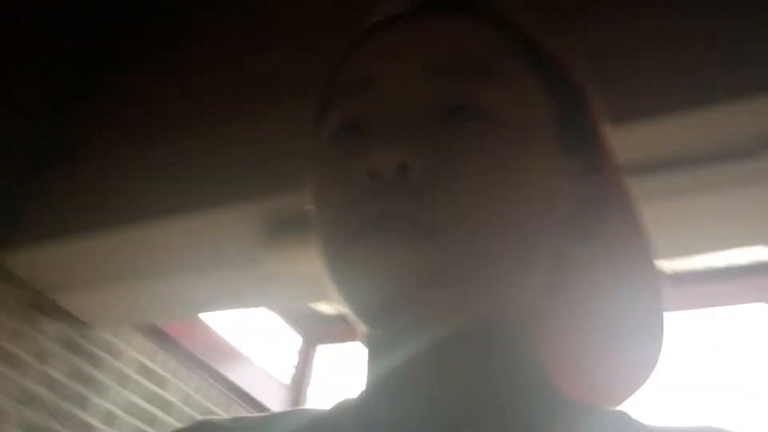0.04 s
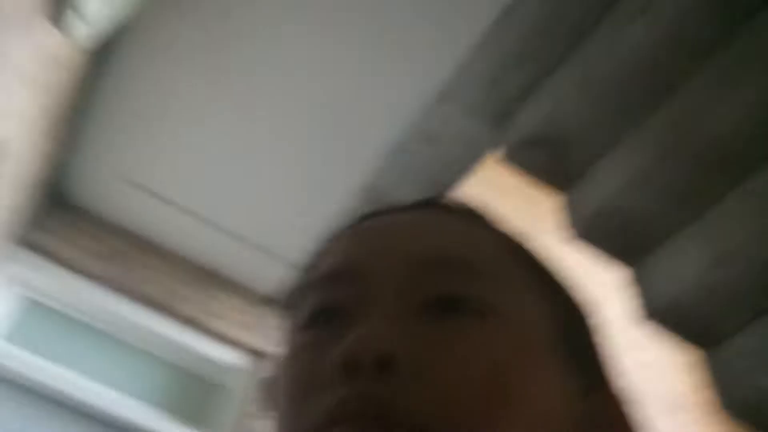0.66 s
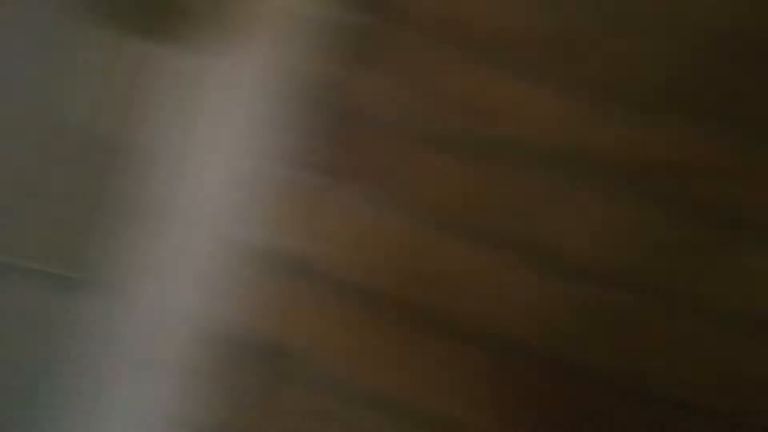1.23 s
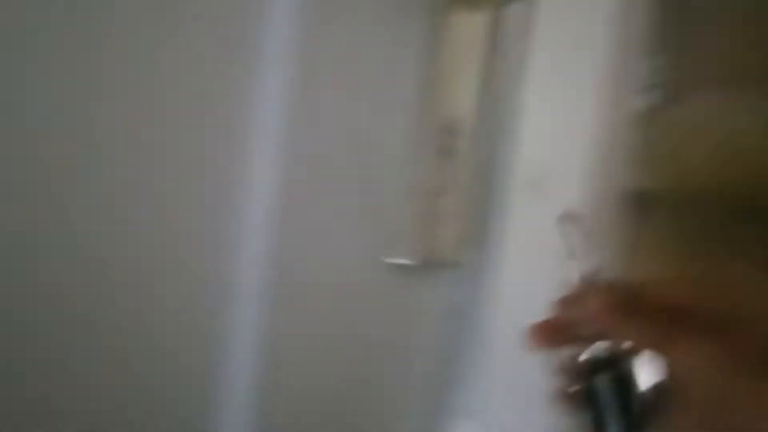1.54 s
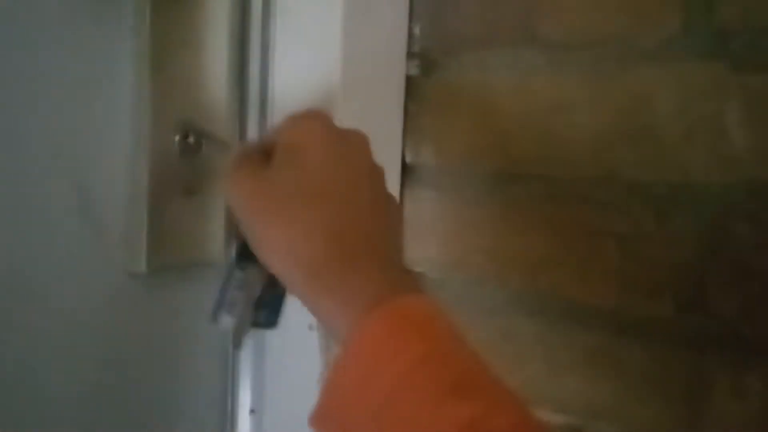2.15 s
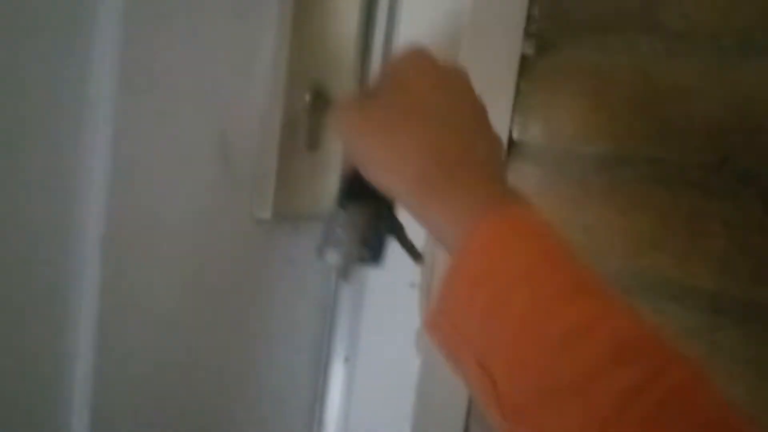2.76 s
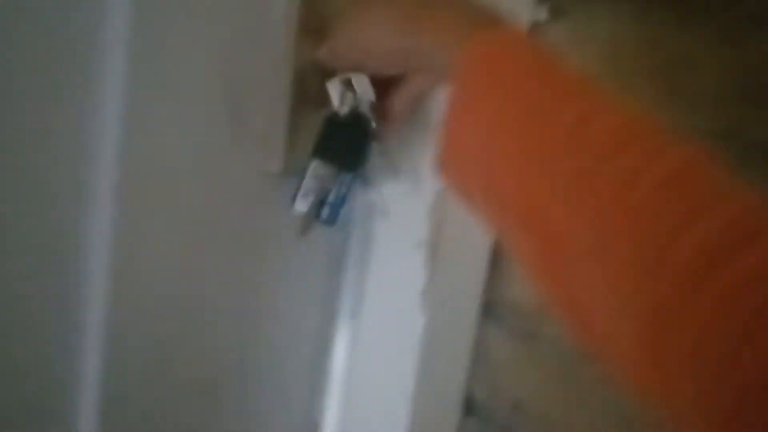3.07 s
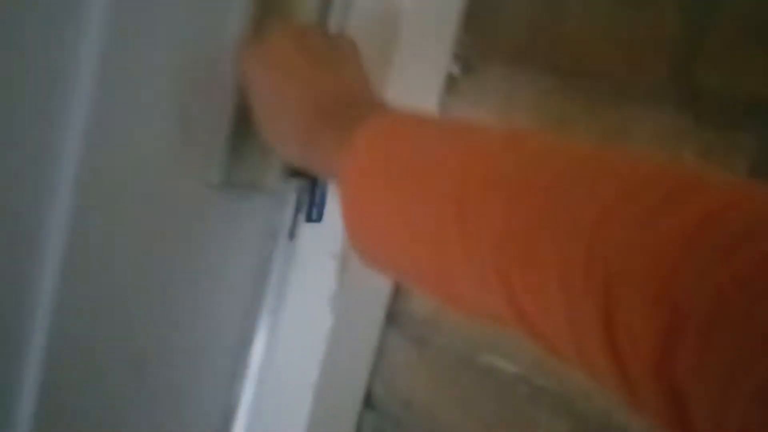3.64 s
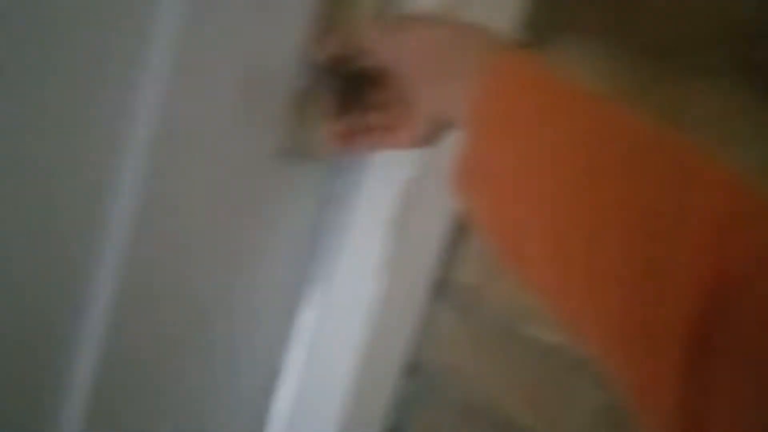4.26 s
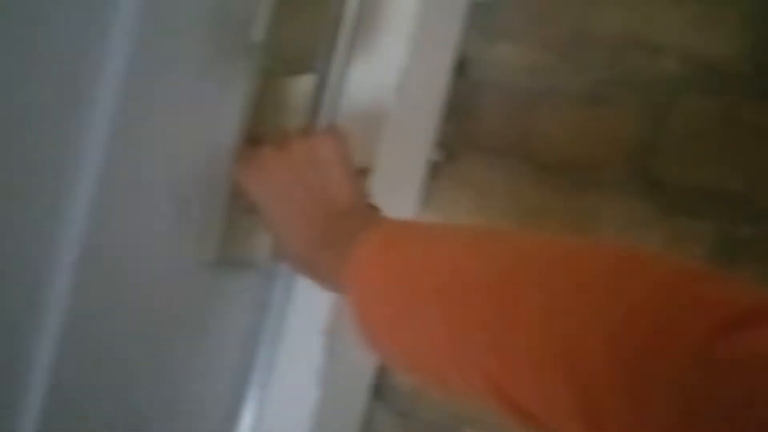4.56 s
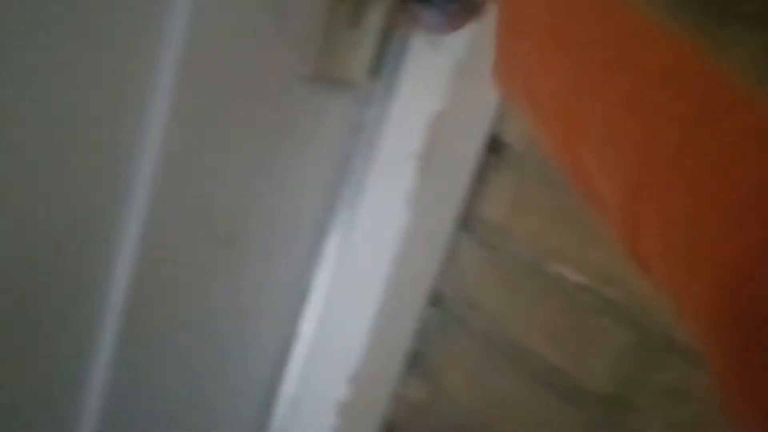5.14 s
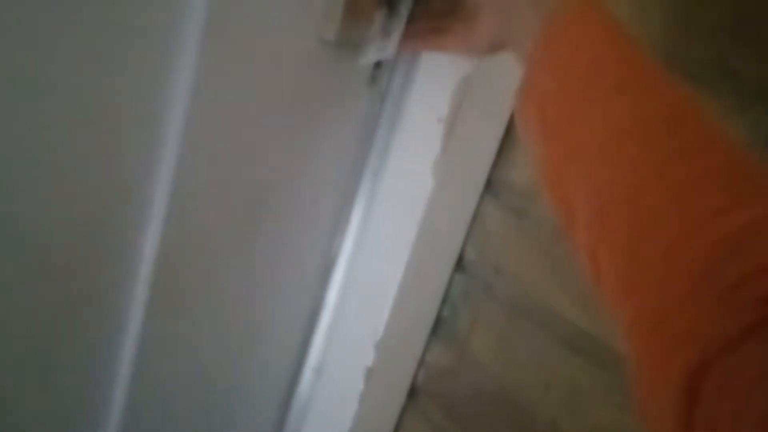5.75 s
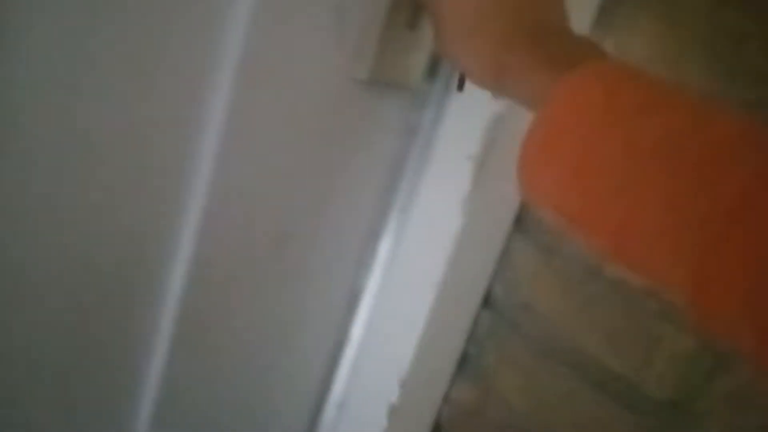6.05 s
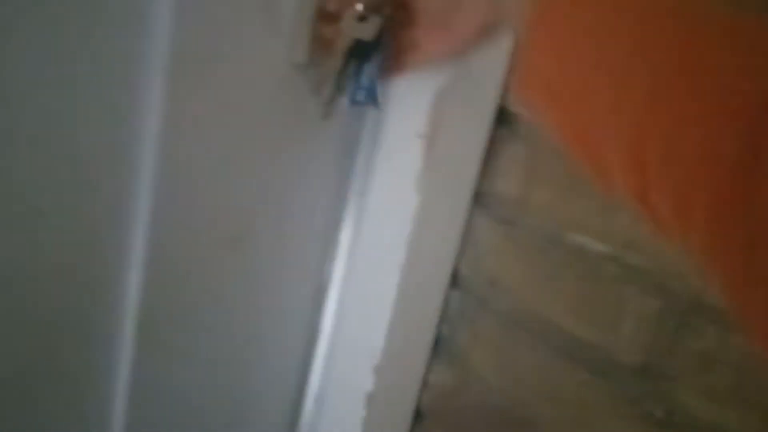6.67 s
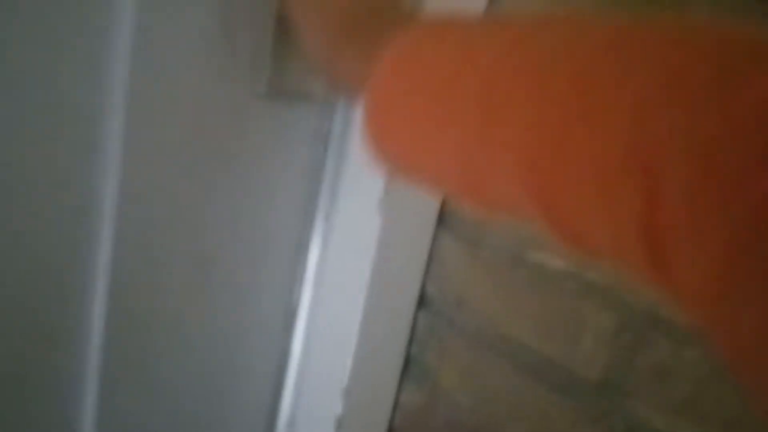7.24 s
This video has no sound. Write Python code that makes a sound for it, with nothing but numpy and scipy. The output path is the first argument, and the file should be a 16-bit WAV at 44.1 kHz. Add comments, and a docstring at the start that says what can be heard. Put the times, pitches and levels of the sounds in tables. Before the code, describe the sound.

For the first second and a half, sleeves and shoes brush softly under a porch roof. At about 1.5 seconds a key taps a door's lock plate and skids with tiny squeaks, while fingers bump and rub dully on the hand-held microphone. At 2 seconds the key clicks into the lock with a low knock, followed by small clicks and scrapes. From about 3.3 seconds it is turned back and forth, grinding over the pins with sharp, uneven metallic clicks and a low rumble from the door, as the hanging keys jingle thinly. The bolt strikes its stop with a loud clack and a boom of the door near 4 seconds, more lightly near 5 and 5.9, and hard again at 6.7. Clicking and jingling continue until about 7.5 seconds. Everything is close, with a short echo from brick walls.

```python
"""Sleeves and soles brush softly under a porch roof, then a key clicks its way into a door lock.
The microphone is close, in a hand-held camera whose case carries the dull bumps of fingers.
The key skids on the lock plate, then is turned to and fro, grinding over the pins while the bunch
jingles. Four times the bolt knocks against its stop and the door booms; brick walls add a short echo."""
import sys
import numpy as np
from scipy import signal
from scipy.io import wavfile
from scipy.ndimage import uniform_filter1d

SR = 44100
rng = np.random.default_rng(int(sys.argv[2]) if len(sys.argv) > 2 else 0)


def digitize_waveform(pressure):
    """Quantize a signal to 16-bit integers and store it at the path in sys.argv[1].

    Rows of a 2-D input are taken as channels; values are limited to [-1, 1].
    """
    field = np.atleast_2d(pressure).T
    bounded = np.clip(field, -1, 1)
    quanta = np.round(bounded * 32767).astype(np.int16)
    wavfile.write(sys.argv[1], SR, quanta)


N = 330750

# The body of a metal contact, heard close. Each row: frequency in Hz, relative level in dB.
STEEL_SPECTRUM = [(60, -11.5), (400, 0), (800, 4.5), (1300, 2.5), (3000, 4.5), (4200, 4), (5200, 2.5),
                  (6300, 3.5), (6900, 0), (7400, -2.5), (8100, -17.5), (10000, -40)]
# The high fizz on top of it. Each row: frequency in Hz, relative level in dB.
FIZZ_SPECTRUM = [(6000, 5.5), (7500, -17), (9300, 3), (10500, 1), (13500, -2), (14500, 6), (15400, 12.5),
                 (16000, -2)]
# The door's panel tones. Each row: frequency in Hz, relative level in dB, t60 in seconds.
PANEL_MODES = [(82, 0, .8), (160, -7, .6), (206, -5, .9), (258, -7, .8), (388, 0, .8), (435, -3, .5),
               (530, -3, .7), (818, -2, .5), (883, -2, .55), (941, -3, .55), (1115, -4, .5)]
# How long the porch holds a sound. Each row: frequency in Hz, t60 in seconds.
PORCH_DECAY = [(100, 0.75), (300, 0.82), (800, 0.79), (2000, 0.71), (5000, 0.47), (8000, 0.39),
               (15000, 0.23)]


def amp(db):
    """Decibels to gain."""
    return 10 ** (np.asarray(db) / 20)


def unit(x, size=None):
    """Scales to rms 1 over the first samples, or over all."""
    return x / np.sqrt(np.mean(x[:size] ** 2) + 1e-20)


def read(points, hz):
    """Reads a table on a log-frequency axis."""
    f, value = np.transpose(points)
    return np.interp(np.log(hz + 1), np.log(f), value)


def add(mix, s, sound):
    """Mixes a sound in at s seconds."""
    part = mix[max(round(s * SR), 0):][:len(sound)]
    part += sound[:len(part)]


def colour(x, spectrum, shape=lambda hz: 0):
    """Minimum-phase filter from a spectrum and an optional extra curve in dB."""
    hz = abs(np.fft.fftfreq(4096, 1 / SR))
    log_gain = np.log(amp(np.maximum(read(spectrum, hz) + shape(hz), -90)))
    taps = np.fft.ifft(np.exp(np.conj(signal.hilbert(log_gain)))).real[:2048]
    return signal.fftconvolve(x, taps)[:len(x)]


def ring(modes, t, uneven_db=3):
    """Dying modes; each blow excites them a little differently."""
    hz, db, t60 = np.transpose(modes)[:, :, None]
    size = amp(db + uneven_db * rng.standard_normal(hz.shape) - 60 * t / t60)
    return (size * np.sin(2 * np.pi * (hz * t + rng.random(hz.shape)))).sum(0)


def grains(per_s, spread_db):
    """Tiny slips of uneven size at random moments."""
    size = amp(spread_db * np.minimum(rng.exponential(1, N), 4))
    return size * rng.choice([-1, 1], N) * (rng.random(N) < per_s / SR)


def pressure(rows, column, t60, rise_s=0.014, swell_db=1.5):
    """Gain from one dB column: each stroke rises, swells as the pressure builds, then dies away."""
    power = np.zeros(N)
    for row in rows:
        start, length, db = row[0], row[1], row[column]
        t = np.arange(0, length + t60, 1 / SR)
        shape_db = swell_db * (np.minimum(t / length, 1) - .5) - 60 * np.maximum(t - length, 0) / t60
        add(power, start, (np.minimum(t / rise_s, 1) * amp(db + shape_db)) ** 2)
    return np.sqrt(power)


def diffuse_tail():
    """One second of noise, each band dying at the porch's rate."""
    hz, t, bands = signal.stft(rng.standard_normal(SR), SR, nperseg=256)
    decay = amp(-60 * t / read(PORCH_DECAY, hz)[:, None])
    return signal.istft(bands * decay, SR, nperseg=256)[1][:SR]


def still_air(level_db=-70):
    """A faint, steady hush at the microphone."""
    # Each row: frequency in Hz, relative level in dB.
    air_spectrum = [(20, -14.5), (80, -4), (180, -2.5), (400, -12.5), (700, -17.5), (3000, -20),
                    (6500, -14), (7600, -31.5), (9000, -24), (11000, -38), (13800, -37), (15300, -21),
                    (16000, -29.5)]
    return amp(level_db) * unit(colour(rng.standard_normal(N), air_spectrum))


def scuffs(rise_s=0.0063):
    """Soles and sleeves brush in fine grains, each stroke starting quickly and fading."""
    # Each row: start in seconds, level in dB, centre in Hz, half-width in octaves, t60 in seconds.
    brushes = [(0.005, -61.5, 1040, 1.3, 0.86), (0.214, -62, 5000, 1.4, 0.98), (0.47, -61, 6530, .5, 0.48),
               (0.779, -52.5, 1190, 2.1, 0.73), (0.9, -68.5, 3500, 1.3, 3.7), (1.201, -64.5, 1250, 3.4, 14),
               (1.3, -47, 5670, .45, 0.49), (1.302, -58, 497, 0.82, 0.65), (1.429, -51.5, 1800, 1.1, 0.38),
               (1.831, -50, 3000, 5.4, 0.25)]
    # Rubbing fabric. Each row: frequency in Hz, relative level in dB.
    cloth_spectrum = [(80, -25), (400, 1.5), (6500, -5), (7600, -12.5), (9500, -25), (11000, -30)]
    out, t = np.zeros(N), np.arange(SR) / SR
    for s, db, centre_hz, octaves, t60 in brushes:
        bell = lambda hz: -10 * np.log10(1 + (np.log2((hz + 1) / centre_hz) / octaves) ** 4)
        fibres = colour(grains(per_s=5000, spread_db=2.5)[:SR], cloth_spectrum, bell)
        add(out, s, amp(db - 60 * t / t60) * (1 - np.exp(-t / rise_s)) * unit(fibres))
    return out


def contacts(lever_gap_s=.0055, strike_hz=3900, clunk_hz=1050, clunk_late_s=.007):
    """The key clicks; at each throw three levers snap up, the bolt hits its stop and the case clunks."""
    # The key in the hand, at the keyhole, then turning. Each row: time in seconds, relative level in dB,
    # centre in Hz, fizz offset in dB.
    key_clicks = [ (.0777, -44.5, 6440, -5), (.2274, -47.5, 5100, -24), (1.5138, -39.5, 2930, -45),
                  (1.5617, -37, 3380, -10.5), (2.002, -29, 3390, -9), (2.0289, -27.5, 6240, -8),
                  (2.0435, -34, 6100, 0), (2.279, -34.5, 3020, -23), (2.358, -39, 2900, -14),
                  (2.384, -42, 3000, -10), (2.402, -43, 2900, -10), (2.415, -41, 2860, 1),
                  (2.422, -33, 2830, -9.5), (2.5287, -44.5, 3520, -33), (2.95, -35, 1470, -29),
                  (3.1527, -49.5, 3500, -30), (3.3732, -37.5, 1870, -11), (3.3932, -32, 1700, -3.5),
                  (3.3997, -30, 3530, -1.5), (3.505, -38, 5300, -28), (3.5224, -31, 2460, -10.5),
                  (3.5454, -34.5, 2960, -23), (3.6348, -33, 6500, 2.5), (3.6704, -37, 2400, -27),
                  (3.8061, -28.5, 2880, -25), (3.864, -39.5, 4370, -14), (3.917, -29, 4380, -20),
                  (4.4287, -39.5, 6050, -20), (4.4538, -34.5, 2070, -11), (4.5401, -43.5, 6400, -19),
                  (4.571, -41, 1750, -10), (4.6825, -38, 3040, -39), (4.7386, -42, 5700, -27),
                  (4.771, -35.5, 3200, -20), (4.803, -37, 5550, -6), (4.9714, -28.5, 4150, -26),
                  (5.031, -28, 4540, -20), (5.1945, -37, 2140, -19), (5.235, -40, 6000, -2),
                  (5.426, -43, 1600, -10), (5.669, -43, 5570, -10.5), (5.8596, -36, 2350, -27),
                  (5.8742, -36, 1780, -20), (5.9306, -37, 5130, -2), (6.042, -31.5, 4600, -11),
                  (6.0617, -31.5, 4530, -7), (6.0901, -43, 2000, 6), (6.2404, -31, 3980, -14),
                  (6.434, -38.5, 2900, -18), (6.4976, -30.5, 3070, -17), (6.5326, -35.5, 2300, -15),
                  (6.5974, -32.5, 2380, -40), (6.6662, -32.5, 1350, -30), (7.0015, -31, 2020, -8),
                  (7.012, -28, 3500, -34), (7.195, -28, 4600, -14), (7.2185, -33.5, 5430, -0.5),
                  (7.3285, -42, 1180, -10), (7.4876, -33.5, 3900, -17)]
    # The bolt's throws. Each row: time in seconds, strike in dB, levers' lead in seconds, first lever
    # in dB, lever centre in Hz, clunk in dB, fizz offset in dB, drop per lever in dB.
    throws = [(3.961, -14.5, .031, -22.5, 1710, -14, -21.5, 1.5),
              (4.9636, -19.5, 0.041, -23, 4000, -53, -10, 2),
              (5.9417, -22, .038, -24.5, 2490, -50, -10.5, 10),
              (6.7138, -15.5, 0.028, -24, 3370, -17.5, -22, 0.5)]
    rows = list(key_clicks)
    for s, strike_db, lead_s, lever_db, lever_hz, clunk_db, fizz_db, drop_db in throws:
        for k in range(3):
            rows.append((s - lead_s + k * lever_gap_s, lever_db - k * drop_db, lever_hz, fizz_db))
        rows.append((s, strike_db, strike_hz, fizz_db - 14))
        rows.append((s + clunk_late_s, clunk_db, clunk_hz, fizz_db - 1))
    return rows


def lock_clicks(slide_s=0.0012, chatter_t60=0.044, clink_t60=0.039, trim_db=-4):
    """Each contact slides, strikes and chatters, leaving the struck part and the lock case ringing."""
    # The lock case. Each row: frequency in Hz, relative level in dB, t60 in seconds.
    case_modes = [(1310, -41, .04), (1600, 19, 0.032), (2310, -16, 0.064), (2590, -29, 0.03),
                  (3020, -27, .04), (3500, -6, 0.068), (3410, 29, 0.032), (3830, -27, .05),
                  (4150, -19, .07), (4280, -6, 0.054), (6750, 16, 0.014)]
    steel, ringing, fizz = np.zeros((3, N))
    lead = 441  # samples ahead of the strike
    t = (np.arange(6000) - lead) / SR
    envelope = np.where(t < 0, amp(-9) * np.exp(-abs(t) / slide_s), amp(-60 * abs(t) / chatter_t60))
    unit_attack = lambda x: x / np.sqrt(np.mean(x[lead:][:180] ** 2))
    for s, db, centre_hz, fizz_db in contacts():
        chatter = rng.standard_normal(len(t)) * np.sqrt(rng.exponential(1, len(t))) * envelope
        crack = chatter + amp(15) * (t == 0)  # the strike is a single spike
        # every point of contact favours its own resonances
        resonances = np.transpose([np.geomspace(700, 16000, 36), 3.5 * rng.standard_normal(36)])
        ripple = lambda hz: read(resonances, hz)
        bell = lambda hz: ripple(hz) - 2.06 * np.minimum(np.log2((hz + 1) / centre_hz) ** 2, 4)
        case = unit_attack(ring(case_modes, abs(t)) * (t >= 0))
        clink = unit_attack(np.sin(2 * np.pi * centre_hz * t) * amp(-60 * abs(t) / clink_t60) * (t >= 0))
        start, gain = s - lead / SR, amp(db + trim_db)
        add(steel, start, gain * unit_attack(colour(crack, STEEL_SPECTRUM, bell)))
        add(ringing, start, gain * (amp(-15) * case + amp(-9) * clink))
        add(fizz, start, gain * amp(fizz_db - 1) * unit_attack(colour(crack, FIZZ_SPECTRUM, ripple)))
    return steel, ringing, fizz


def door_boom(rise_s=0.00043, panel_db=-3, focus_db=5):
    """Blows from key and bolt shake the door leaf: a few strong panel tones in a dense boom."""
    # Each row: time in seconds, level in dB, favoured region in Hz, bass gain below 130 Hz in dB.
    knocks = [(1.523, -46.5, 508, -4), (2.03, -40, 443, 8), (2.275, -49, 386, -10), (2.95, -51, 626, -13.5),
              (3.401, -47.5, 530, -9), (3.932, -36, 920, -17), (3.965, -28.5, 945, 8.5),
              (4.456, -50, 690, -4), (4.965, -45, 400, 28), (5.944, -35, 537, -0.5), (6.683, -35, 860, -4),
              (6.716, -29, 990, 3), (6.75, -32, 1050, -4), (7.005, -42, 500, -12)]
    # The dense part of the boom. Each row: frequency in Hz, relative level in dB.
    boom_spectrum = [(30, -40.5), (80, -5.5), (150, -3.5), (280, -3.5), (420, 2), (680, -1.5), (920, -7.5),
                     (1200, -8.5), (1500, -8.5), (3500, -15), (6300, -30), (8000, -35)]
    out, t = np.zeros(N), np.arange(SR) / SR
    for s, db, centre_hz, bass_db in knocks:
        dense = unit(colour(diffuse_tail(), boom_spectrum), size=2000)
        panel = unit(ring(PANEL_MODES, t, uneven_db=5.5), size=2000)
        boom = (dense + amp(panel_db) * panel) * (1 - np.exp(-t / rise_s))
        octaves = lambda hz: np.log2((hz + 1) / centre_hz)
        tone = lambda hz: (focus_db * np.exp(-2 * octaves(hz) ** 2)
                           - 2 * np.clip(octaves(hz), 0, 2)  # softer treble
                           + bass_db / (1 + (hz / 130) ** 4))
        add(out, s, amp(db) * unit(colour(boom, [(1, 0)], tone), size=2000))
    return out


def handling(bump_t60=0.042, grip_t60=0.59):
    """Fingers bump and rub the camera; its case carries them, dull and dry, to the microphone."""
    # Each row: time in seconds, level in dB, pitch in Hz.
    bumps = [(1.569, -30.5, 124), (1.661, -30.5, 163), (1.701, -29.5, 135), (1.848, -29.5, 125),
             (1.866, -25, 180), (1.877, -31, 286), (1.946, -38, 154), (2.024, -26.5, 150),
             (2.269, -33.5, 140), (3.716, -36, 100)]
    # Each row: start in seconds, length in seconds, level in dB.
    grip_shifts = [(1.55, .33, -45.5), (2.24, .1, -50), (2.35, 0.086, -42), (3.58, 0.17, -48)]
    # Sound through the case. Each row: frequency in Hz, relative level in dB.
    thud_spectrum = [(20, -20), (50, -4), (120, 4.5), (220, -4), (400, -11), (900, -60)]
    out, t = np.zeros(N), np.arange(4000) / SR
    dying = amp(-60 * t / bump_t60)
    for s, db, hz in bumps:
        thud = unit(colour(rng.standard_normal(len(t)) * dying, thud_spectrum), size=600)
        add(out, s, amp(db) * (np.sin(2 * np.pi * hz * t) * dying + amp(-6) * thud))
    lumps = unit(grains(per_s=45, spread_db=2.5))
    skin = amp(-3) * rng.standard_normal(N) + amp(-4) * lumps
    return out + pressure(grip_shifts, column=2, t60=grip_t60) * unit(colour(skin, thud_spectrum))


def key_skid(start_s=1.632, length_s=0.26, from_hz=1900, to_hz=3200, slip_s=.015, slip_t60=0.047):
    """The key's tip sticks and slips over the lock plate in tiny squeaks that rise in pitch and fade."""
    out, t = np.zeros(N), np.arange(2500) / SR
    gaps = slip_s * rng.uniform(.5, 1.5, 30)
    for late in np.cumsum(gaps) - gaps[0]:
        noise, detune = rng.standard_normal(len(t)), rng.uniform(.92, 1.08)
        progress = late / length_s
        if progress < 1:
            pitch_hz = detune * (from_hz + progress * (to_hz - from_hz))
            grit = unit(colour(noise, STEEL_SPECTRUM, lambda hz: -15 * abs(np.log2((hz + 1) / pitch_hz))))
            envelope = amp(-41 - 18 * progress - 60 * t / slip_t60)
            add(out, start_s + late, envelope * (np.sin(2 * np.pi * pitch_hz * t) + amp(1) * grit))
    return out


def key_grinding(stick_s=0.01, pins_per_s=70, pin_count=8, pin_t60=0.023):
    """The key sticks and slips over brass and snaps single pins; the door's panel tones rumble along."""
    # Pushes and twists of the wrist. Each row: start in seconds, length in seconds, relative scrape
    # level in dB, relative rumble level in dB.
    twists = [(1.99, 0.02, -51, -44), (2.245, 0.11, -57.5, -51), (2.345, 0.056, -44.5, -39.5),
              (2.5, 0.3, -70.5, -62.5), (2.87, 0.084, -58, -53.5), (3.225, .1, -66.5, -62),
              (3.32, 0.092, -48.5, -53), (3.58, 0.092, -44, -42), (3.74, 0.17, -52.5, -48),
              (4.375, .22, -56, -50), (4.715, .19, -45, -48.5), (4.88, .17, -45.5, -45),
              (5.18, 0.11, -52, -48.5), (5.38, 0.056, -49.5, -48.5), (5.62, 0.27, -58, -59),
              (5.85, 0.15, -47.5, -57), (6.435, 0.13, -46, -44), (6.66, 0.22, -46.5, -60),
              (6.94, 0.11, -51.5, -45.5), (7.16, 0.14, -48.5, -51), (7.37, 0.14, -55, -59)]
    slips = grains(per_s=6000, spread_db=3.5)
    sticking = unit(uniform_filter1d(rng.standard_normal(N), round(stick_s * SR)))
    slips *= amp(1.5 * sticking)
    scrape = unit(colour(slips, STEEL_SPECTRUM)) + amp(-20) * unit(colour(slips, FIZZ_SPECTRUM))
    snaps, t = np.zeros(N), np.arange(1500) / SR
    for _ in range(pin_count):
        releases = grains(per_s=pins_per_s / pin_count, spread_db=2.5)
        snap = rng.standard_normal(len(t)) * amp(-60 * t / pin_t60)
        snaps += signal.oaconvolve(releases, snap)[:N]
    pins = unit(colour(snaps, STEEL_SPECTRUM)) + amp(-15) * unit(colour(snaps, FIZZ_SPECTRUM))
    # The grinding as the door carries it. Each row: frequency in Hz, relative level in dB.
    rumble_spectrum = [(30, -20.5), (80, 1.5), (200, 6), (290, -1.5), (420, 5), (600, 4.5), (760, -11),
                       (1000, -4), (1400, -50), (3000, -63)]
    shudder = unit(colour(rng.standard_normal(N), rumble_spectrum))
    panel = unit(signal.fftconvolve(shudder, ring(PANEL_MODES, np.arange(SR) / SR, uneven_db=4))[:N])
    metal = pressure(twists, column=2, t60=0.34) * (scrape + pins)
    rumble = pressure(twists, column=3, t60=0.72) * unit(shudder + amp(-5) * panel)
    return amp(-5) * metal + amp(-1) * rumble


def key_jingle(gap_s=0.0079, settle_db=22, damping_db_per_s=120):
    """The hanging keys tick together and ring with thin, high tones, ever softer through each shake."""
    # Each row: start in seconds, length in seconds, opening level in dB.
    shakes = [(2, 0.038, -59), (2.343, 0.065, -66), (3.325, 0.12, -62), (3.488, 0.17, -58),
              (3.598, 0.11, -54), (4.379, 0.067, -59.5), (4.82, 0.12, -47.5), (4.974, 0.07, -41),
              (5.238, 0.029, -51), (5.394, .06, -70), (5.854, 0.16, -57), (6.001, 0.11, -57),
              (6.083, 0.012, -50.5), (6.457, 0.087, -66), (6.946, 0.076, -43), (7.18, 0.07, -44.5)]
    # The keys' tones. Each row: frequency in Hz, relative level in dB, t60 in seconds before damping.
    key_modes = [(5690, 2, .3), (5790, 1, .22), (5986, -3, .14), (6700, -8, .06), (8920, -18, .12),
                 (10010, -14, .2), (10230, -18, .1), (11860, -12, .08), (11945, -9, .17), (12080, -14, .07),
                 (14460, -20, .2), (15100, -12, .08), (15370, -8, .1)]
    out, t = np.zeros(N), np.arange(SR // 3) / SR
    for s, length, db in shakes:
        gaps = gap_s * rng.uniform(.4, 1.6, 14)
        for late in np.cumsum(gaps) - gaps[0]:
            noise, detune = rng.standard_normal(len(t)), rng.uniform(.994, 1.006)
            tones = ring(key_modes, t * detune, uneven_db=5.5) * amp(-damping_db_per_s * t)
            if late < length:
                tick = colour(noise * np.exp(-t / 0.0014), FIZZ_SPECTRUM)
                collision = unit(tones, size=400) + amp(-3) * unit(tick, size=400)
                add(out, s + late, amp(db - settle_db * late / length) * collision)
    return out


def porch(x, wet_db):
    """Brick walls and a low roof scatter each sound into a diffuse tail that dies band by band."""
    hz, t, (direct, noise) = signal.stft([x, rng.standard_normal(N)], SR, nperseg=256, noverlap=192)
    power = uniform_filter1d(abs(direct) ** 2, 5, axis=0)  # blurred over neighbouring bands
    kept = amp(-60 * t[1] / read(PORCH_DECAY, hz)) ** 2  # share of the energy left after each frame
    lingering = np.array([signal.lfilter([0, 0, 1 - k], [1, -k], band) for k, band in zip(kept, power)])
    echo = np.sqrt(abs(lingering)) * noise / np.std(noise)
    return x + amp(wet_db) * signal.istft(echo, SR, nperseg=256, noverlap=192)[1][:N]


def scene():
    """One microphone near the lock: cracks and jingles fill the porch, the lock's ringing stays close."""
    air = still_air()
    steel, ringing, fizz = lock_clicks()
    metal = porch(steel + key_skid(), wet_db=-7) + ringing + porch(fizz + key_jingle(), wet_db=-10.5)
    return (metal + door_boom() + key_grinding() + scuffs() + handling() + air)[None]


def record(dry, ceiling=0.48, edge_hz=16100):
    """The recorder rounds off the highest peaks, then cuts the top of the treble."""
    rounded = ceiling * np.tanh(dry / ceiling)
    lowpass = signal.firwin(255, edge_hz, window=("kaiser", 9), fs=SR)
    return signal.oaconvolve(rounded, lowpass[None], "same")


dry = scene()
out = record(dry)
digitize_waveform(out)
```